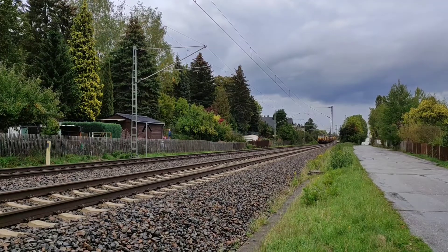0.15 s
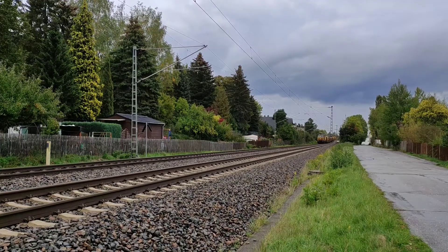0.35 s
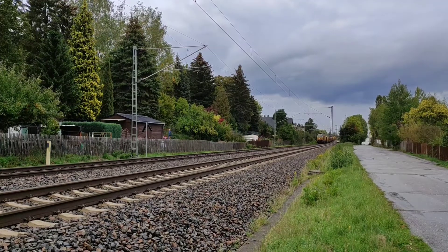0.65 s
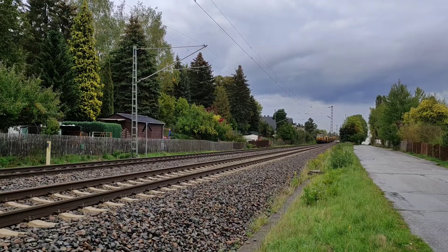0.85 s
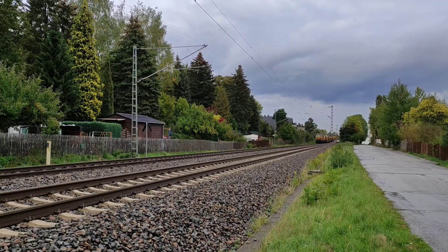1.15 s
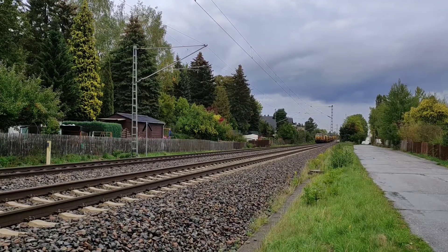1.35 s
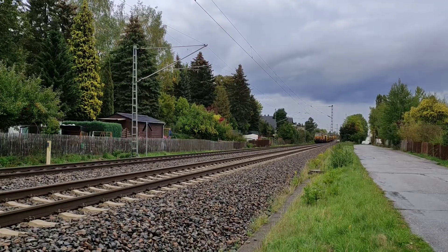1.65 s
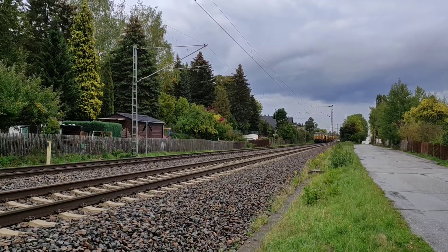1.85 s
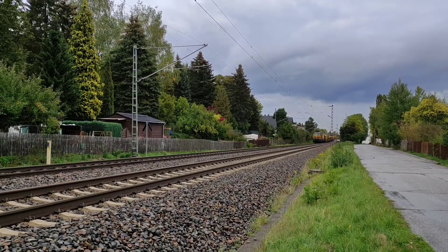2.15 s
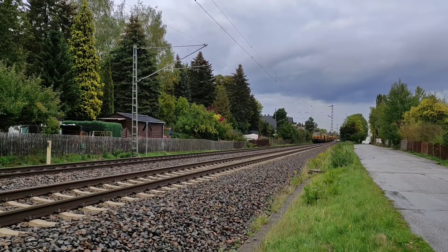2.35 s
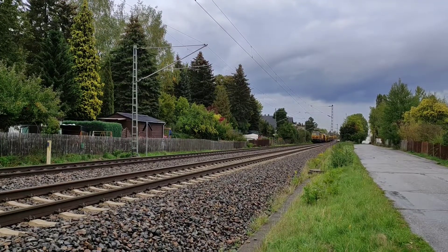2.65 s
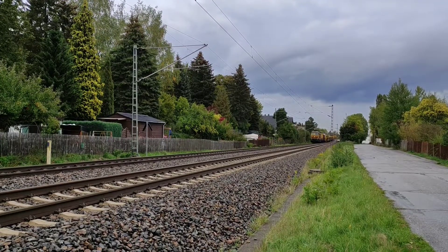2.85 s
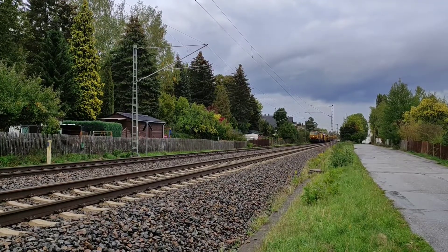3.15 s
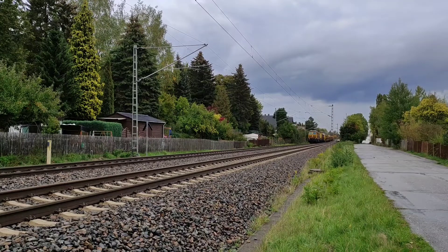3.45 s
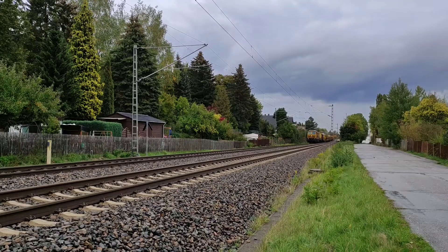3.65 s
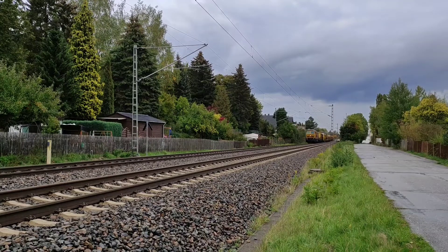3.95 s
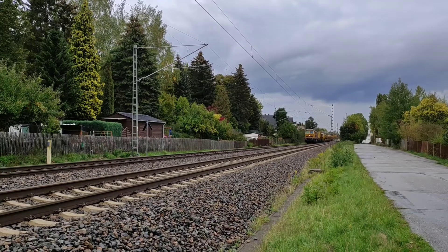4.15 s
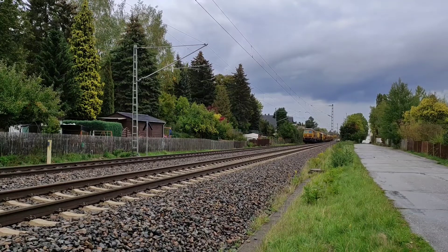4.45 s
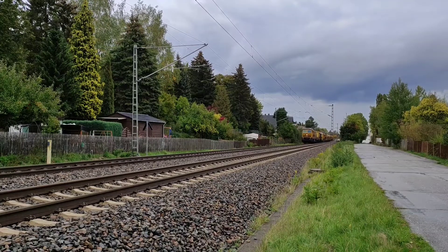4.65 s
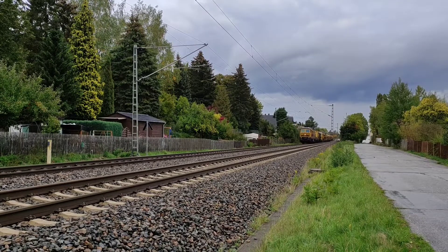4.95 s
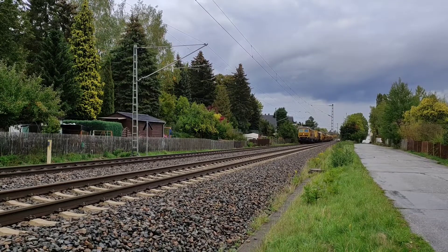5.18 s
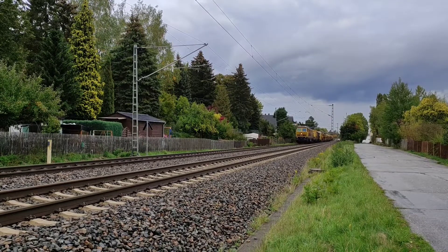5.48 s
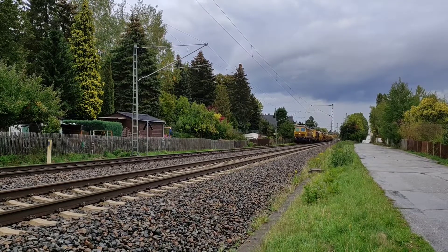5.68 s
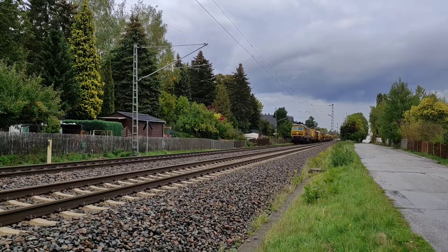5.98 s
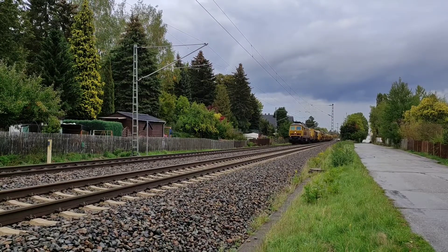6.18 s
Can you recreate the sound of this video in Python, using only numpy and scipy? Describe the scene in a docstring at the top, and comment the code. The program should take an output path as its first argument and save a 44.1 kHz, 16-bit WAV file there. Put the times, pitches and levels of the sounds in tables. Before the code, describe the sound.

Open-air trackside ambience with gusty low wind bumps, mainly on the right, in the first second and a half. Behind it a distant diesel engine drones with a quick, low pulsing throb and an unsteady thin whine. Rail rumble and wheel roar build continuously, short pitched swells poke through, and metallic hiss brightens. A fixed stereo microphone hears the approach only, ending while still rising.

```python
"""A throbbing diesel works train draws nearer on a straight track, heard from the lineside path.
The exhaust is a stack of tones at multiples of the engine cycle; the fan and a whine are unsteady tones.
Wheels and rails rumble, roar, ring and hiss louder as shaped noise, with short swells of one pitch.
Light wind buffets mainly the right of two microphone ports, as low noise and single puffs."""
import sys
import numpy as np
from scipy import signal
from scipy.fft import rfft, irfft
from scipy.io import wavfile
from scipy.ndimage import uniform_filter1d

SR = 44100
rng = np.random.default_rng(int(sys.argv[2]) if len(sys.argv) > 2 else 0)


def file_out(sig):
    """Save sig as 16-bit WAV at sys.argv[1]."""
    # one column per channel
    cols = np.atleast_2d(sig).T
    # limit, then scale
    lim = np.clip(cols, -1, 1)
    pcm = np.round(lim * 32767).astype(np.int16)
    wavfile.write(sys.argv[1], SR, pcm)


N = 278712  # length in samples

# how far the right port runs ahead of the left: (f/Hz, lead/radians)
RIGHT_LEAD = [(150, 0.062), (600, 0.51), (1250, 1.3), (1700, 3.91), (2350, 3.9), (2900, 2.9), (4700, 4.04),
              (6000, 5.05), (7200, 7.3)]
# the rumble also sets the weak engine tones: level at the start distance, and dB gained per dB of nearness
RUMBLE_DB, RUMBLE_GROWS = -45, 0.92


def gain_of(db):
    """Turns decibels into a gain."""
    return 10 ** (np.asarray(db) / 20)


def evened(x):
    """Scales a signal to rms 1."""
    return x / np.sqrt(np.mean(np.abs(x) ** 2) + 1e-20)


def read(points, hz):
    """Reads a (frequency, value) table, with straight lines over log frequency."""
    f, value = np.transpose(points)
    return np.interp(np.log(hz + 1), np.log(f + 1), value)


def follow(rows):
    """Draws each column of a timed table as a curve, sample by sample."""
    seconds, *columns = np.transpose(rows)
    t = np.arange(N) / SR
    return np.array([np.interp(t, seconds, column) for column in columns])


def add(mix, s, sound):
    """Lays a sound into the mix, centred on second s."""
    at = round(s * SR) - sound.shape[-1] // 2
    mix[..., at:at + sound.shape[-1]] += sound


def bumps(rows):
    """A level curve in dB of soft rises and falls; each row's length is its width at half height."""
    out = np.zeros(N + SR)
    for s, db, length in rows:
        width = round(2 * length * SR) // 2 * 2
        add(out, s, db * np.hanning(width))
    return out[:N]


def drift(rate_hz):
    """Random wandering of rms 1, with changes much faster than rate_hz smoothed away."""
    z = rfft(rng.standard_normal(4096))
    hz = np.arange(len(z)) * SR / N
    coarse = irfft(z / (1 + (hz / rate_hz) ** 4))
    return np.interp(np.arange(N) / N, np.arange(4096) / 4096, evened(coarse))


def noise(spectrum, patchy_db, flicker_db, size=1024):
    """Noise from random short-time spectra, with drifting patches and a shared flicker, at both ports."""
    # how alike the ports are: (f/Hz, likeness); a value below 0 flips the sign,
    # where one port sits in a notch of the ground echo
    likeness = [(60, 0.98), (200, 1), (420, 0.81), (800, 0.35), (1000, 0.56), (1170, 0.97), (1320, 0.03),
                (1750, 0.3), (1940, 0.38), (2070, -1.57), (2200, 0.3), (2330, 0.82), (2650, 0.073),
                (2920, 0.74), (3060, -0.34), (3200, 0.35), (3400, -0.023), (3600, -0.11), (4400, 0.05),
                (4700, 0.87), (6000, 0.18), (9000, -0.033)]
    # left port louder than right: (f/Hz, difference/dB)
    left_louder = [(300, -.5), (1000, 0), (1450, 4), (1780, 2), (1950, -4), (2200, 10.5), (2400, 2),
                   (2700, 6), (3100, 4), (3700, 2), (5300, 0), (6200, 6.5), (7700, 20), (8700, 14),
                   (9700, 13), (10600, 6.5), (13000, 3.5)]
    hop = size // 4
    hz = np.fft.rfftfreq(size, 1 / SR)
    frames = N // hop + 5
    a, b, c, d, patches = rng.standard_normal((frames, len(hz), 5)).T

    patches = uniform_filter1d(patches, size=14, axis=0)  # smooth over frequency
    patches = evened(uniform_filter1d(patches, size=12, axis=1))  # smooth over time
    flicker = evened(uniform_filter1d(rng.standard_normal(frames), size=4))

    # the right port hears part of the left's noise and part of its own
    same = np.clip(read(likeness, hz), -1, 1)[:, None]
    left = a + 1j * b
    shared = same * left * np.exp(1j * read(RIGHT_LEAD, hz))[:, None]
    right = shared + np.sqrt(1 - same ** 2) * (c + 1j * d)
    z = np.array([left, right * gain_of(-read(left_louder, hz))[:, None]])
    z *= gain_of(read(spectrum, hz)[:, None] + patchy_db * patches + flicker_db * flicker)
    out = signal.istft(z, nperseg=size, noverlap=size - hop)[1][:, :N]
    return out / np.sqrt(np.mean(out.mean(0) ** 2))  # rms 1 for the average of the ports


def tone(turns, db, hz):
    """A sine of rms level db at both ports; hz only sets the phase step between them."""
    lead = np.array([[-.5], [.5]]) * read(RIGHT_LEAD, hz)
    return np.sqrt(2) * gain_of(db) * np.cos(2 * np.pi * turns + lead)


def nearness():
    """Sound gains 6 dB for each halving of distance; this is the gain in dB since the start."""
    start_m, speed_m_s = 197.3, 20.35  # first distance of the locomotive, and its speed
    return -20 * np.log10(1 - speed_m_s * np.arange(N) / SR / start_m)


def wind():
    """Air pushes on the ports: lumpy low noise that swells in gusts, and single puffs."""
    # colour of the wind noise: (f/Hz, relative level/dB per Hz)
    wind_colour = [(10, 13), (28, 10), (40, 1), (90, 3), (150, -14), (250, -17), (400, -54)]
    # gusts: (t of the peak/s, rise above calm/dB, width at half height/s)
    gust_rises = [(.45, 9, 0.18), (.95, 14, 0.23), (1.2, 12.5, 0.27), (1.75, 8, 1), (3.33, 15, 0.18),
                  (4.33, 11, 0.23), (4.75, 5, 0.37)]
    # puffs: (t of the peak/s, peak level/dB, half of the whole length/s, sign of the middle push)
    single_puffs = [(.883, -34, 0.026, -1), (0.93, -31, .025, -1), (0.973, -24.5, 0.013, -1),
                    (1.004, -29, 0.018, 1), (1.05, -40, 0.03, 1), (1.084, -29, 0.0094, 1),
                    (1.166, -25.5, 0.0071, 1), (1.2, -22.5, 0.013, -1), (1.23, -22, 0.02, -1),
                    (1.262, -28, 0.02, -1), (1.295, -28, 0.02, 1), (1.54, -28, 0.023, -1)]
    calm_db = -50  # right port between gusts
    lumps = rng.standard_normal(N) * gain_of(1.7 * drift(18.0))
    colour = gain_of(read(wind_colour, np.fft.rfftfreq(N, 1 / SR)))
    push = irfft(rfft(lumps) * colour, N)
    push = evened(push) * gain_of(calm_db + bumps(gust_rises))
    for s, db, length, sign in single_puffs:
        u = np.linspace(-4, 4, round(2 * length * SR))
        shape = (1 - u ** 2) * np.exp(-u ** 2 / 2)  # one push between two opposite pulls
        add(push, s, np.sign(sign) * gain_of(db) * shape)
    return push * gain_of([[-18], [0]])  # left port, right port


def swells():
    """Short bursts of one pitch stand out of the roar, each a sine with soft edges."""
    # (t of the peak/s, level/dB before the 2 dB cut below, f/Hz, whole length/s)
    bursts = [(.81, -42, 1157, .05), (1.139, -44, 713, .07), (1.39, -42.5, 1180, .07),
              (1.955, -41, 1120, .04), (2.554, -46, 746, .07), (2.701, -46.5, 732, .2),
              (3.193, -42, 1110, .06), (3.6, -43, 1175, .05), (3.858, -40, 1128, .05),
              (5.65, -46.5, 1248, .9)]
    out = np.zeros((2, N))
    for s, db, hz, length in bursts:
        t = np.arange(round(length * SR)) / SR
        burst = tone(hz * t + rng.random(), db - 2.0, hz)
        add(out, s, burst * np.hanning(len(t)))
    return out


def rolling(near_db):
    """Rough wheels on rough rails: wagon bodies rumble, sleepers and rail roar, wheels ring, contact hisses."""
    # colours at the left port, before scaling to level: (f/Hz, relative level/dB per Hz)
    # wagon bodies
    rumble_colour = [(15, 0), (24, 0), (33, 9), (42, 9.5), (55, 17), (70, 16), (85, 10.5), (100, 5),
                     (125, 0.5), (160, 0), (220, 0.5), (300, -11), (450, -45)]
    # sleepers and rail
    roar_colour = [(150, -13.5), (250, -1), (350, -6), (420, -4), (550, -1.5), (800, 0), (950, -1),
                   (1200, -2), (1450, -6), (1900, -8), (2600, -38.5)]
    # wheels
    ring_colour = [(900, -34), (1050, -7.5), (1150, -4.5), (1280, -6.5), (1480, -11.5), (1750, -7.5),
                   (1930, -8), (2100, 0), (2250, 1), (2450, -4), (2700, -6), (2950, -5.5), (3400, -12),
                   (4500, -13.5), (5500, -16), (7000, -52)]
    # contact of wheel and rail
    hiss_colour = [(3000, -36), (4500, -7.5), (5500, -8), (6200, -0.5), (7000, 1), (7800, 1.5), (8300, -6),
                   (8800, -16.5), (9500, -20), (11000, -30)]
    # highest part of the contact sound
    fizz_colour = [(7500, -6.5), (9000, 2.5), (10500, 4.5), (11800, -3.5), (13000, 3), (14500, -0.5)]
    # hiss: (t/s, level/dB)
    hiss_levels = [(0, -60.5), (.9, -60.5), (1.5, -56), (2.4, -51.5), (3.3, -49.5), (3.6, -47), (4.1, -47),
                   (5.3, -45.5), (6.32, -45)]
    # brief surges of the treble: (t of the peak/s, rise/dB, width at half height/s)
    treble_surges = [(.48, 2, .2), (1.09, 2, .08), (1.46, 1, 0.068), (4.06, 2, 0.097), (4.53, 1, 0.11),
                     (5.86, 1, 0.11), (6.07, 1.5, 0.092), (6.28, 1.5, 0.13)]
    roar_db, roar_grows = -47.5, 1.38  # level at the start distance, dB gained per dB of nearness
    mid_db, ring_db, fizz_db = -51.5, -46, -69  # ring and fizz levels while the hiss stands at mid_db
    ring_grows, fizz_grows = 0.73, 2.08  # dB gained per dB of hiss

    hiss_db = follow(hiss_levels)[0] + bumps(treble_surges)
    above_mid_db = hiss_db - mid_db
    rumble = noise(rumble_colour, patchy_db=1.5, flicker_db=0.8, size=4096)
    roar = noise(roar_colour, patchy_db=1.0, flicker_db=0.63)
    ring = noise(ring_colour, patchy_db=1.01, flicker_db=0.87)
    hiss = noise(hiss_colour, patchy_db=1.0, flicker_db=1.04, size=512)
    fizz = noise(fizz_colour, patchy_db=1.0, flicker_db=1.1, size=512)
    return (gain_of(RUMBLE_DB + RUMBLE_GROWS * near_db) * rumble
            + gain_of(roar_db + roar_grows * near_db) * roar
            + gain_of(ring_db + ring_grows * above_mid_db) * ring
            + gain_of(hiss_db) * hiss
            + gain_of(fizz_db + fizz_grows * above_mid_db) * fizz)


def whine(near_db):
    """A fuzzy whine comes and goes: one tone whose pitch climbs slowly and shakes at random."""
    # (t/s, level at the start distance/dB)
    whine_levels = [(0, -59), (.3, -50), (.75, -59), (.95, -51.5), (1.75, -52.5), (1.9, -61), (2.05, -51.5),
                    (2.35, -55), (2.55, -60), (2.85, -53), (3.1, -56), (3.6, -56), (3.85, -53), (4.15, -60),
                    (4.5, -51), (4.8, -56), (5.5, -53), (5.95, -53), (6.32, -60)]
    start_hz, rise_hz_per_s = 1722, 4.1
    hz = start_hz + rise_hz_per_s * np.arange(N) / SR
    turns = np.cumsum(hz + 5.33 * drift(13.6)) / SR
    db = follow(whine_levels)[0] + near_db + 3.3 * drift(22.0)
    return tone(turns, db, hz.mean())


def fan(near_db):
    """Passing fan blades make tones that waver with the air on their way, the higher ones more."""
    # fading in and out on its way over the ground, levels at the start distance:
    # (t/s, 1st multiple level/dB, 3rd multiple level/dB, 4th multiple level/dB)
    fan_levels = [(0, -51.5, -55.5, -72), (.8, -52, -54, -63), (1.25, -58, -58, -61),
                  (2.0, -52.5, -66, -62), (2.6, -52.5, -66, -72), (2.95, -51, -52.5, -55),
                  (3.45, -51, -56.5, -62), (3.85, -53, -48, -56), (4.55, -48, -54.5, -54),
                  (5.15, -53.5, -50, -58.5), (5.75, -51, -58.5, -58), (6.1, -53, -51, -60),
                  (6.32, -58.5, -50.5, -73)]
    blade_hz = 233.13  # blades passing
    turns = np.arange(N) / SR * blade_hz + 0.012 * drift(2.5)
    first, third, fourth = follow(fan_levels) + near_db
    levels = {1: first, 2: first - 14, 3: third, 4: fourth, 5: fourth - 5}
    out = np.zeros((2, N))
    for k, db in levels.items():
        out += tone(k * turns + rng.random(), db + 0.5 * k ** 1.42 * drift(17.0), k * blade_hz)
    return out


def exhaust(near_db):
    """Uneven firing gives multiples of the engine cycle; neighbours beat once a cycle."""
    # strong tones: {multiple of the cycle: level at the start distance/dB}
    strong_tones = {5: -40.5, 6: -35, 7: -39.5, 9: -56.5}
    # weak tones: {multiple of the cycle: level against the rumble/dB}
    weak_tones = {4: -20, 11: -19, 12: -14.5, 13: -17, 15: -20.5, 18: -18.5}
    # the loudest multiple, the 6th, sags and swells: (t/s, change from its usual level/dB)
    sixth_changes = [(0, -2), (.35, -5.5), (.75, 1.5), (1.3, 1.5), (1.55, 0), (1.7, 0), (1.87, -6),
                     (2.1, 0.5), (2.65, 0.5), (2.85, -3.5), (3.45, -3.5), (3.7, 2.5), (4.0, -3.5),
                     (4.6, -1), (5.2, 1), (5.9, 2), (6.32, -1.5)]
    cycle_hz = 8.823  # engine cycles a second
    delay_cycles, chamber_hz, half_width_hz = .2, 48, 3.5  # silencer
    slower, faint_db, loose_turns = 0.98, -13.5, 0.11  # second throb: speed ratio, level change, waver
    waver_turns, waver_db = .025, .9  # random phase and level waver of each main tone

    cycles = np.arange(N) / SR * cycle_hz - delay_cycles
    levels = []
    for k, db in strong_tones.items():
        levels.append((k, db + near_db + (k == 6) * follow(sixth_changes)[0]))

    # a fainter, slightly slower throb beats with the main one
    out = np.zeros((2, N))
    for k, db in levels:
        turns = k * slower * cycles + rng.random() + loose_turns * drift(4.5)
        out += tone(turns, db + faint_db, k * cycle_hz)

    rumble_db = RUMBLE_DB + RUMBLE_GROWS * near_db
    for k, db in weak_tones.items():
        levels.append((k, rumble_db + db + 1.1 * drift(0.77)))

    for k, db in levels:
        # phase turns round the silencer chamber's resonance
        late = np.arctan((k * cycle_hz - chamber_hz) / half_width_hz) / (2 * np.pi)
        # no two cycles fire alike, so every multiple wavers by itself
        turns = k * cycles - late + waver_turns * drift(6.0)
        out += tone(turns, db + waver_db * drift(2.5), k * cycle_hz)
    return out


def scene():
    """Adds up the locomotive, the wheels and the wind."""
    near_db = nearness()
    engine = exhaust(near_db) + fan(near_db) + whine(near_db)
    return engine + rolling(near_db) + swells() + wind()


def record(dry):
    """Limits the band: a steep low-pass filter removes what lies above the edge."""
    edge_hz = 14300
    low_pass = signal.firwin(1023, edge_hz, window=("kaiser", 12), fs=SR)
    return signal.oaconvolve(dry, low_pass[None], "same")


dry = scene()
out = record(dry)
file_out(out)
```